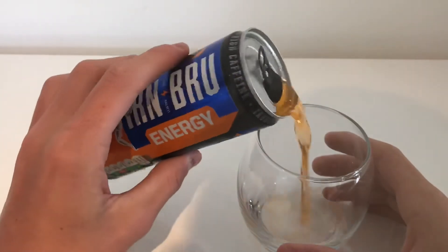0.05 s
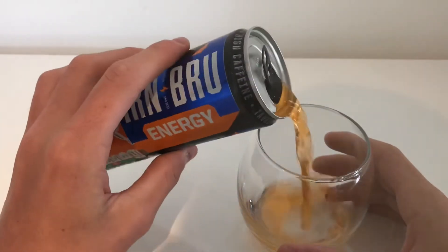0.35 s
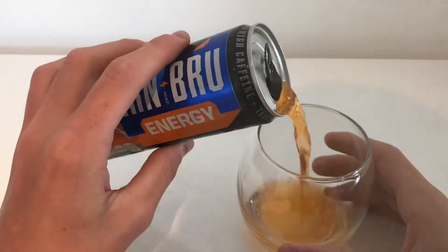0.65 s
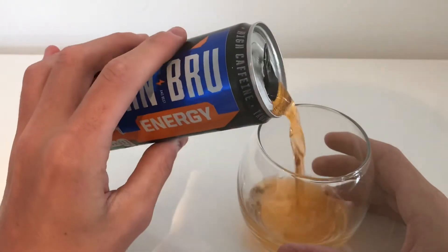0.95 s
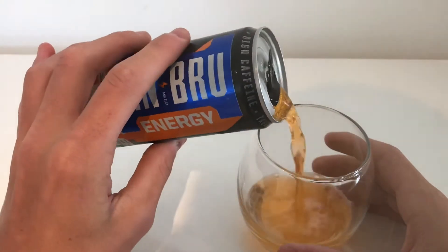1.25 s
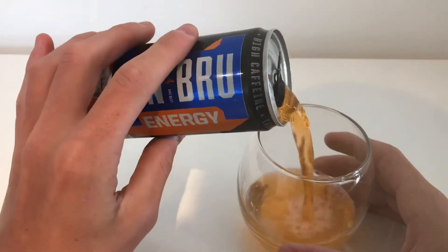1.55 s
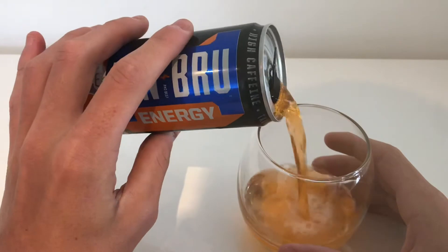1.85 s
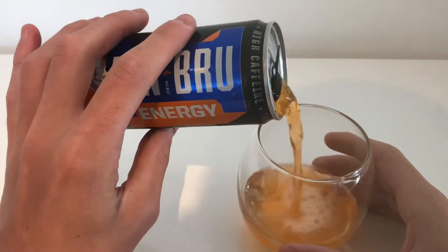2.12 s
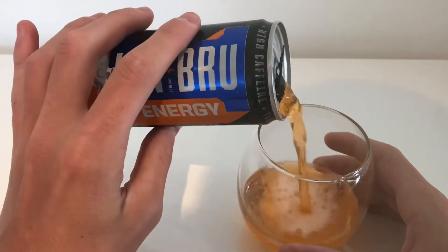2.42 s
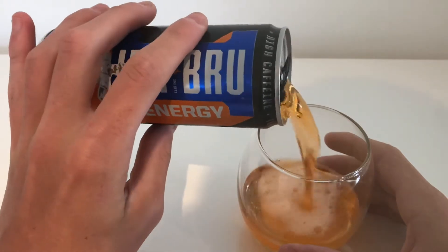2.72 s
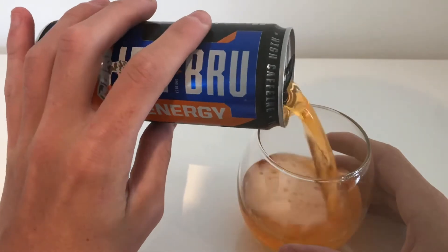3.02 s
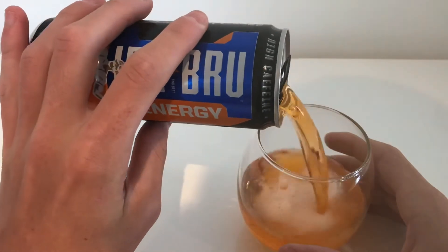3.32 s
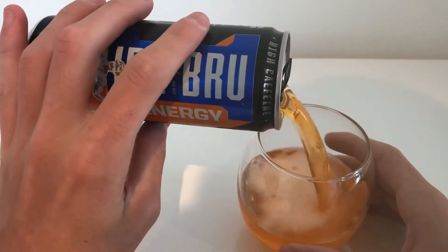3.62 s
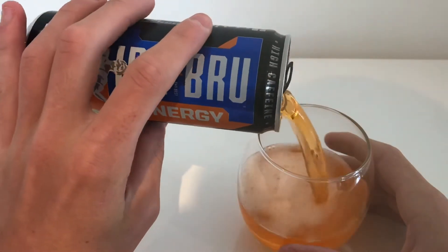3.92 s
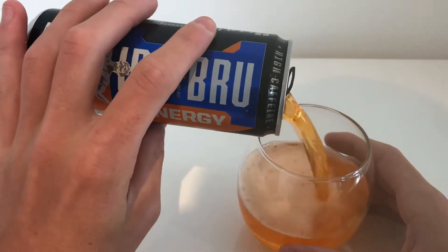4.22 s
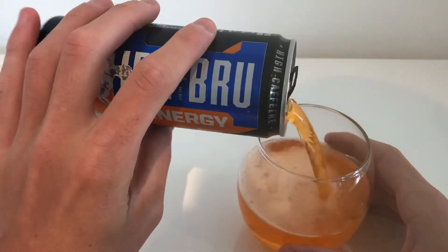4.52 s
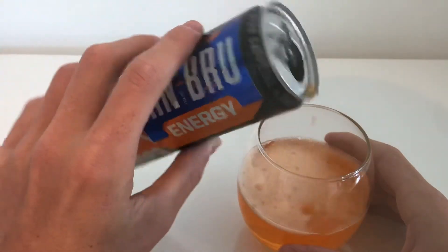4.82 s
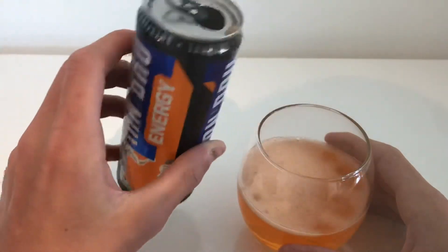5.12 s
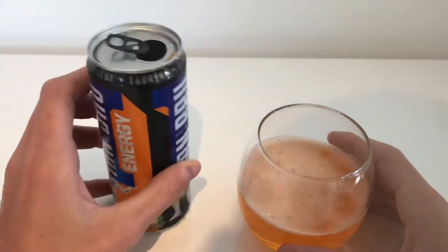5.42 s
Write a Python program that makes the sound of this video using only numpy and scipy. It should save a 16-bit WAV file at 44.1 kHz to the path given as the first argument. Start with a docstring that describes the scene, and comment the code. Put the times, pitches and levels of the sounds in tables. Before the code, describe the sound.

A fizzy drink is poured from a can into a round glass. The stream first spatters brightly on the bare bottom, then turns to glugs and gurgles as the glass fills. A hiss of foam grows and softens the gurgling. The pour ends with a few drips, and the can is set on the table with a loud, hard knock and rocks once while the fizz goes on. Heard close up in a small, quiet room.

```python
"""Pouring a fizzy drink

A can is emptied into a round glass, close by, on a table in a small room. The stream spatters on the
bare bottom, then traps large glugging bubbles. Each bubble rings: the smaller it is, the higher its note.
A head of foam grows, and its fizz rings the air in the glass. The pour stops, and the can is set down
with a hard knock and rocks once."""
import sys
import numpy as np
from scipy import signal
from scipy.fft import rfft, irfft
from scipy.io import wavfile

SR = 44100
rng = np.random.default_rng(int(sys.argv[2]) if len(sys.argv) > 2 else 0)


def master_out(mix):
    """Clip the mix to full scale and print it as 16-bit PCM to the path in sys.argv[1]."""
    frames = np.transpose(np.atleast_2d(mix))
    ceiling = np.clip(frames, -1, 1)
    pcm = np.round(ceiling * 32767).astype(np.int16)
    wavfile.write(sys.argv[1], SR, pcm)


N = 245195

# Levels in the tables are relative. A fade time (t60) is how long a sound takes to fall by 60 dB.
# The loudest splashes and last drips. Each row: start in seconds, ring in dB, pitch in Hz, splash in dB.
SPLASHES = [(0.0968, -43, 12500, -65.5), (0.175, -44.5, 2540, -61), (0.2179, -47, 13200, -73),
            (0.2377, -50, 11500, -61.5), (0.3002, -43, 13400, -60), (0.328, -42, 9200, -53),
            (0.3545, -36, 8330, -49.5), (0.368, -47, 4660, -63), (0.3872, -42.5, 4180, -74),
            (0.414, -38.5, 4260, -78), (0.427, -39, 5740, -51), (0.455, -34, 11900, -56),
            (0.477, -40, 10400, -64), (0.538, -47, 9980, -54), (0.552, -58, 8900, -48),
            (0.5625, -45, 8380, -51), (0.5754, -51, 5000, -54), (0.626, -47.5, 2330, -58),
            (0.669, -44, 7960, -54), (0.709, -53, 3080, -55), (0.7936, -37, 11700, -51.5),
            (0.81, -45, 4900, -46.5), (0.823, -53, 2650, -49), (0.859, -26, 7570, -37),
            (0.8666, -37, 7140, -54), (0.9099, -40.5, 5900, -57), (0.93, -46, 5700, -51),
            (1.0066, -50, 2790, -55), (1.0915, -41.5, 5200, -55), (1.1127, -42, 8970, -54),
            (4.9025, -38.5, 8040, -56), (4.906, -48, 2320, -47.5), (4.9513, -46, 10000, -52)]
# The loudest large bubbles. Each row: start in seconds, ring in dB, pitch in Hz, slap in dB.
GLUGS = [(0.577, -47.5, 1185, -60), (0.611, -47, 1176, -58), (0.826, -42, 1104, -44),
         (0.859, -40.5, 1490, -67), (0.897, -37.5, 1286, -66), (1.073, -46, 1360, -45),
         (1.09, -38, 1294, -45), (1.152, -39.5, 1185, -64), (1.19, -40.5, 1090, -59),
         (1.213, -41.5, 1510, -45), (1.234, -36, 1337, -50), (1.248, -39.5, 826, -46.5),
         (1.339, -27.5, 1043, -44), (1.577, -40, 1165, -44.5), (1.681, -44.5, 1100, -56),
         (1.701, -44, 1160, -66), (1.998, -35.5, 902, -65), (2.011, -40.5, 587, -48), (2.14, -40, 775, -55),
         (2.184, -51.5, 866, -57), (2.308, -52.5, 1030, -52.5), (2.432, -53, 706, -55),
         (2.586, -46, 1260, -52), (2.898, -48, 860, -52), (3.003, -51, 760, -60), (3.073, -53, 720, -51),
         (4.719, -38.5, 1415, -47.5)]
# How loud the foam hisses. Each row: time in seconds, level in dB.
FOAM_LEVELS = [(0.19, -79), (0.41, -72.5), (1.1, -65), (1.74, -60.5), (2.25, -65.5), (2.65, -62.5),
               (3.5, -63.5), (3.85, -60), (5.3, -59.5)]
# Surges of the stream. Each row: start in seconds, length in seconds, level in dB.
SURGES = [(0.304, 0.13, 0), (0.536, .12, -1), (0.81, 0.088, -6), (1.072, 0.42, -1.5), (1.544, 0.14, -4.5),
          (1.95, 0.32, -4), (2.3, 0.3, -4), (2.704, 0.26, -6), (3.26, 0.62, -9.5), (4.679, 0.063, 2)]
# Hands shifting on can and glass. Each row: start in seconds, length in seconds, level in dB.
HAND_MOVES = [(1.41, 0.23, -63.5), (2.333, 0.025, -49), (2.464, 0.19, -58.5), (2.7, 0.056, -56),
              (2.855, 0.09, -62), (3.497, 0.29, -66.5), (4.404, 0.17, -60), (4.653, 0.029, -52.5)]
# The can meets the table. Each row: start in seconds, ring in dB, contact time in seconds, crack in dB.
KNOCKS = [(5.3406, -18, 0.00022, -13), (5.3415, -4.5, 0.00049, -14), (5.3435, -16, 0.00063, -20),
          (5.4546, -23, 0.00074, -36.5), (5.519, -47, 0.00056, -69)]
# Notes of the can and table top. Each row: pitch in Hz, level in dB, fade time in seconds.
CAN_NOTES = [(124, -19.5, 0.16), (169, -10, 0.058), (202.7, -27, 0.29), (227, -10, 0.055), (276, -35, 0.15),
             (373, -21.5, 0.076), (496, -22, 0.094), (630, -8.5, 0.053), (694, -14, 0.074),
             (800, -2, 0.023), (876, -7.5, 0.084), (940, -8, 0.035), (1000, -12, 0.067),
             (1080, -5.5, 0.023), (1370, -17, 0.079), (1736, -16, 0.067), (2170, -33, 0.11),
             (2280, -10, 0.033), (2660, -9.5, 0.071), (2600, -34, 0.059), (3000, -31, 0.061),
             (3110, -13, 0.059), (3410, -22, 0.088), (3420, -11.5, 0.071)]
# Notes of the air above the foam. Each row: pitch in Hz, width in Hz before scaling, level in dB.
AIR_NOTES = [(1057.5, 18.5, 4.5), (1189, 133, -2.5), (1467, 164, -9), (2478, 134, -13.5)]
# Notes of the round glass. Each row: pitch in Hz, width in Hz, level in dB.
GLASS_NOTES = [(684, 13, 4), (839, 47, 1), (1120, 34, -2), (2498, 50, 7), (4740, 57, -17)]
# How long the room echoes. Each row: frequency in Hz, fade time in seconds.
ROOM_FADES = [(150, 0.3), (700, 0.4), (3000, 0.28), (7000, 0.31), (14000, 0.13)]
# Colours: how much bass and treble each noise has. Each row: frequency in Hz, level in dB.
ROOM_COLOUR = [(22, -13.5), (40, -0.5), (190, -11.5), (538, -12), (735, -14.5), (815, -9), (1440, -47),
               (3070, -21.5), (3500, -22), (15000, -37)]
SPLASH_COLOUR = [(700, -21), (1600, 8.5), (2100, -20), (2550, 6.5), (3000, 3.5), (4500, 2.5), (7000, -13.5),
                 (12000, -7.5)]
SPRAY_COLOUR = [(3000, -39), (7000, 0), (9500, 13), (12500, 4), (16000, 5.5)]
THIN_FOAM_COLOUR = [(1500, -21), (2000, -10), (2350, -8), (2530, -30), (2800, -15.5), (3900, -2.5),
                    (4400, 3.5), (4950, -7.5), (5550, 0.5), (7400, -7.5), (9500, 1), (10400, -5.5),
                    (12800, -0.5), (15500, -6.5)]
THICK_FOAM_COLOUR = [(1500, 3.5), (2150, -5), (2400, 2), (2950, -15), (3500, -1), (4400, 1.5), (4950, -1.5),
                     (5800, 3), (7400, -7), (8500, 1), (9900, 0.5), (10450, -5.5), (11200, 2), (15500, -1)]
CHURN_COLOUR = [(130, -1), (250, -11.5), (400, 0), (580, -1), (730, -10.5), (840, -7.5), (980, -4),
                (1600, -7), (3000, -13)]
GLUG_COLOUR = [(90, -48), (170, -22), (330, -19), (600, -4.5), (830, 12), (1400, 11), (2000, -22),
               (4000, -21)]
CRACK_COLOUR = [(65, -32), (125, 2.5), (956, -3.5), (1520, -18), (1690, -9), (2750, -11), (3050, -7),
                (3390, -16.5), (3610, -13), (3850, -14.5), (7250, -24.5), (9540, -21), (15500, -31.5)]
HAND_COLOUR = [(18, -35), (45, 14), (85, 16), (150, -17), (300, -44), (900, -47)]

POOL_START_S, POOL_DEEP_S = 0.45, 0.9  # the drink gets deep enough to gurgle and churn
FOAM_COVER_S, MUFFLE_DB_PER_S = 3.26, 8  # the closing foam smothers the gurgle
AIR_RISE_S, FOAM_CLOSED_S = 2.76, 4.18  # the air in the glass rings louder as foam covers the drink
POUR_END_S, POUR_FADE_S = 5.2, 0.6  # the can is tipped back


def undb(db):
    """Turn decibels into a gain."""
    return 10 ** (np.asarray(db) / 20)


def unit(x):
    """Scale a sound to an average (rms) level of 1."""
    return x / np.sqrt(np.mean(x ** 2))


def add(out, start, sound):
    """Mix a sound in at a start time in seconds."""
    i = max(int(start * SR), 0)
    out[i:i + len(sound)] += sound[:max(N - i, 0)]


def fade(t, t60):
    """Die away, 60 dB down after t60 seconds."""
    return np.exp(-np.log(1000) * t / t60)


def swell(start, length, rise, t60):
    """A level that rises, holds until start + length, then fades; all in seconds."""
    return np.clip((T - start) / rise, 0, 1) * fade(np.maximum(T - start - length, 0), t60)


def colour(x, points, size=2048):
    """Shape a sound's bass and treble to follow (Hz, dB) points."""
    hz, db = np.transpose(points)
    freqs = np.maximum(np.fft.rfftfreq(size, 1 / SR), 1)
    gain = undb(np.interp(np.log(freqs), np.log(hz), db))
    # build the filter so that it never sounds ahead of its input
    cepstrum = irfft(np.log(gain))
    cepstrum[1:size // 2] *= 2
    cepstrum[size // 2 + 1:] = 0
    return signal.fftconvolve(x, irfft(np.exp(rfft(cepstrum))))[:len(x)]


def resonate(x, hz, width):
    """Make a sound ring at one pitch; a smaller width in Hz rings longer."""
    return signal.lfilter(*signal.iirpeak(hz, hz / width, fs=SR), x)


def pops(rate, spread_db):
    """Random clicks, about rate a second: many small ones and a few large."""
    size = undb(spread_db * np.minimum(rng.exponential(size=N), 3))
    return (rng.random(N) < rate / SR) * size * rng.choice([-1, 1], N)


def ringing_pops(rate, spread_db, hz, width):
    """Random clicks, filtered twice so that they ring at one pitch."""
    return resonate(resonate(pops(rate, spread_db), hz, width), hz, width)


def bursts(starts, levels_db, points, t60):
    """Short puffs of coloured noise with a quick rise."""
    envelope, t = np.zeros(N), T[:SR // 8]
    for start, db in zip(starts, levels_db):
        add(envelope, start, undb(db) * fade(t, t60) * (1 - np.exp(-t / 0.00055)))
    puffs = colour(envelope * rng.standard_normal(N), points)
    return puffs / np.std(colour(rng.standard_normal(SR), points))


def bubble(hz, t60, glide):
    """A trapped bubble rings almost at once, and its pitch climbs as it nears the surface."""
    t = T[:int(t60 * SR) + 2]
    phase = 2 * np.pi * hz * t * (1 + glide * t / t60 / 2)
    return np.sin(phase) * fade(t, t60) * (1 - np.exp(-2 * hz * t))


def swarm(count, low_hz, octaves, spread_db, t60, glide):
    """Bubbles at random times, pitches and strengths; smaller ones ring more briefly."""
    out = np.zeros(N)
    for when, pitch, strength in rng.random((count, 3)):
        hz = min(low_hz * 2 ** (octaves * pitch), SR / 3)
        add(out, when * T[-1], undb(spread_db * strength) * bubble(hz, t60 * np.sqrt(low_hz / hz), glide))
    return unit(out)


def room_tone():
    """The quiet, steady hush of the room."""
    return undb(-67) * unit(colour(rng.standard_normal(N), ROOM_COLOUR))


def splashes():
    """Each splash rings one small bubble, scatters briefer ones and throws a puff of spray."""
    out = np.zeros(N)
    starts, ring_db, pitches, strength_db = np.transpose(SPLASHES)
    tilt_db = 4 * np.log2(pitches / 5640)  # the smaller the bubble, the more of the splash is fine spray
    coarse_db, fine_db = strength_db - tilt_db, strength_db + tilt_db
    for start, db, hz, splash_db, spray_db in zip(starts, ring_db, pitches, coarse_db, fine_db):
        add(out, start + 0.00067, undb(db + 1.5) * bubble(hz, 0.017 * (hz / 4000) ** -0.5, glide=0.063))
        for late, pitch, tiny_late, tiny_pitch in rng.random((4, 4)):
            small = bubble(1900 * 3.8 ** pitch, t60=0.011, glide=0.11)
            tiny = bubble(8500 * 1.8 ** tiny_pitch, t60=0.0051, glide=0.7)
            add(out, start + 0.00098 + 0.0099 * late, undb(splash_db - 6) * small)
            add(out, start + 0.0011 + 0.0028 * tiny_late, undb(spray_db + 3.5) * tiny)
    splats = undb(-2) * bursts(starts, coarse_db, SPLASH_COLOUR, t60=0.022)
    spray = undb(4) * bursts(starts, fine_db, SPRAY_COLOUR, t60=0.026)
    return out + splats + spray


def stream():
    """Countless drops tinkle and drum, air pockets gurgle and the drink churns; all follow the surges."""
    surge = sum(undb(db) * swell(start, length, rise=0.02, t60=0.33) for start, length, db in SURGES)
    even_flow = undb(-6.5)
    flow = np.hypot(surge, even_flow) * fade(np.maximum(T - POUR_END_S, 0), POUR_FADE_S)
    # small drops are thrown about until the foam cushions them
    drops = swarm(count=3000, low_hz=1584, octaves=2.69, spread_db=41, t60=0.018, glide=0.074)
    drops *= undb(-67.5) * swell(start=0.27, length=1.03, rise=0.08, t60=0.72)
    # fine spray flies only while the bottom is nearly bare
    spray = swarm(count=1500, low_hz=4160, octaves=1.9, spread_db=22, t60=0.018, glide=0.13)
    spray += undb(-7) * unit(colour(pops(rate=900, spread_db=7), SPLASH_COLOUR))
    spray *= undb(-59.5) * swell(start=0.29, length=0.58, rise=0.21, t60=0.98)
    drum = undb(-70) * unit(ringing_pops(rate=370, spread_db=5.5, hz=161, width=126))
    drum *= np.interp(T, [POOL_DEEP_S, FOAM_COVER_S], [1, 0.4])  # the rising drink cushions the bottom
    gurgles = swarm(count=1100, low_hz=670, octaves=1.29, spread_db=32, t60=0.013, glide=0.17)
    gurgles *= undb(-66.5 - MUFFLE_DB_PER_S * np.maximum(T - FOAM_COVER_S, 0))
    churn = undb(-63.5) * unit(colour(pops(rate=500, spread_db=5.5), CHURN_COLOUR))
    depth = np.interp(T, [POOL_START_S, POOL_DEEP_S], [0.15, 1])
    return flow * (drops + spray + drum + depth * (gurgles + churn))


def foam():
    """Tiny bursting bubbles hiss, and the hiss changes as the foam thickens."""
    thin, thick = (unit(colour(pops(rate=12000, spread_db=2.2), [(300, -40)] + points))
                   for points in (THIN_FOAM_COLOUR, THICK_FOAM_COLOUR))
    # while the foam is thin, single drops keep striking the glass's own note
    tinks = undb(-12.5) * unit(ringing_pops(rate=120, spread_db=5.5, hz=2516, width=61))
    thickness = np.interp(T, [2.9, 3.9], [0, 1])
    fizz = np.sqrt(1 - thickness) * (thin + tinks) + np.sqrt(thickness) * thick
    times, levels_db = np.transpose(FOAM_LEVELS)
    return fizz * undb(np.interp(T, times, levels_db) + 1)


def glass_air():
    """The fizz rings the air above the drink, loudest once foam has covered it."""
    air = sum(undb(db) * ringing_pops(rate=2500, spread_db=1, hz=hz, width=1.45 * width)
              for hz, width, db in AIR_NOTES)
    level_db = np.interp(T, [AIR_RISE_S, FOAM_CLOSED_S], [-74.5, -58.5])
    level_db -= 0.5 * np.maximum(T - FOAM_CLOSED_S, 0)
    first_foam = np.interp(T, [0.5, 1.1], [0.2, 1])
    return unit(air) * undb(level_db) * first_foam


def glugs():
    """An air pocket slaps shut; the large bubble rings and shakes the air in the glass."""
    rings = np.zeros(N)
    for start, db, hz, _ in GLUGS:
        add(rings, start + 0.00083, undb(db + 2) * bubble(hz, t60=0.026, glide=0.04))
    starts, ring_db, _, slap_db = np.transpose(GLUGS)
    shaken_air = undb(-12) * bursts(starts, ring_db, GLUG_COLOUR, t60=0.061)
    slaps = undb(1) * bursts(starts, slap_db, SPLASH_COLOUR, t60=0.019)
    return rings + shaken_air + slaps


def hands():
    """Hands rumble softly as they shift on the can and the glass."""
    rumble = unit(colour(pops(rate=180, spread_db=4.5), HAND_COLOUR, size=8192))
    grip = sum(undb(db) * swell(start, length, rise=0.02, t60=0.19) for start, length, db in HAND_MOVES)
    return undb(-5) * rumble * grip


def can_knock():
    """The can's rim lands in quick contacts and rocks; softer contacts leave out the high notes."""
    t = T[:SR // 2]
    ring = sum((-1) ** k * undb(db) * np.cos(2 * np.pi * hz * t) * fade(t, t60)
               for k, (hz, db, t60) in enumerate(CAN_NOTES))
    # the hollow main note is fed by the blow and takes a few cycles to swell
    swell_s, hollow_hz = 0.006, 503
    ring += undb(-9) * t / swell_s * np.exp(1 - t / swell_s) * np.cos(2 * np.pi * hollow_hz * t)
    out, push_t = np.zeros(N), T[:SR // 50]
    for start, db, contact_s, _ in KNOCKS:
        push = push_t * np.exp(-2 * np.pi * push_t / contact_s)
        add(out, start, undb(db) * signal.fftconvolve(ring, push / push.sum()))
    starts, _, _, crack_db = np.transpose(KNOCKS)
    out += bursts(starts, crack_db, CRACK_COLOUR, t60=0.032)
    # a small table top gives off almost no deep bass
    out = signal.sosfilt(signal.butter(5, 125, "high", fs=SR, output="sos"), out)
    thud_hz = 66  # the whole table gives under the can
    thud = np.sin(2 * np.pi * thud_hz * t) * fade(t, t60=0.055) * (1 - np.exp(-thud_hz * t))
    add(out, starts[0], undb(-25) * thud)
    return out


def glass_ring(x):
    """The round glass rings on after a sound inside it."""
    return x + undb(1) * sum(undb(db) * resonate(x, hz, width) for hz, width, db in GLASS_NOTES)


def room_echo(x, early_db, tail_db):
    """Quick echoes from glass, table and wall, then a short tail that dulls as it fades."""
    t = T[:SR // 2]
    hz, t60 = np.transpose(ROOM_FADES)
    spectrum, freqs = rfft(rng.standard_normal(len(t))), np.fft.rfftfreq(len(t), 1 / SR)
    tail = np.zeros(len(t))
    for low_hz in 2.0 ** np.arange(6, 16):
        octave = irfft(spectrum * (freqs >= low_hz) * (freqs < 2 * low_hz), len(t))
        tail += octave * fade(t, np.interp(low_hz * np.sqrt(2), hz, t60)) * (t > 0.006)
    early = rng.standard_normal(len(t)) * fade(t, t60=0.035) * (t > 0.0015)
    echoes = undb(early_db) * early / np.linalg.norm(early) + undb(tail_db) * tail / np.linalg.norm(tail)
    return x + signal.fftconvolve(x, echoes)[:N]


def scene():
    """The pour, the foam and the can in one room, as one channel."""
    pour = room_echo(glass_ring(splashes() + glugs() + stream()), early_db=-8, tail_db=-12.5)
    fizz = room_echo(foam() + glass_air(), early_db=-17.5, tail_db=-12)
    knock = room_echo(can_knock(), early_db=-15, tail_db=-16)
    return (pour + fizz + knock + room_tone() + hands())[None]


def record(dry):
    """Cut the very highest treble, above 15900 Hz."""
    return signal.sosfilt(signal.ellip(10, 0.2, 70, 15900, fs=SR, output="sos"), dry)


T = np.arange(N) / SR  # the time of every sample in seconds

dry = scene()
out = record(dry)
master_out(out)
```